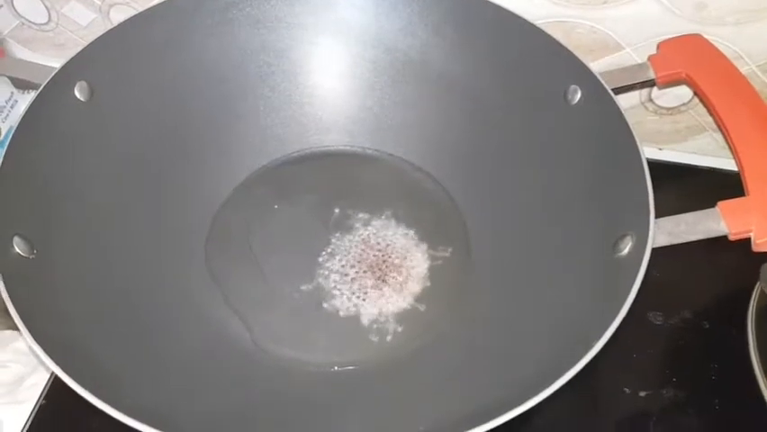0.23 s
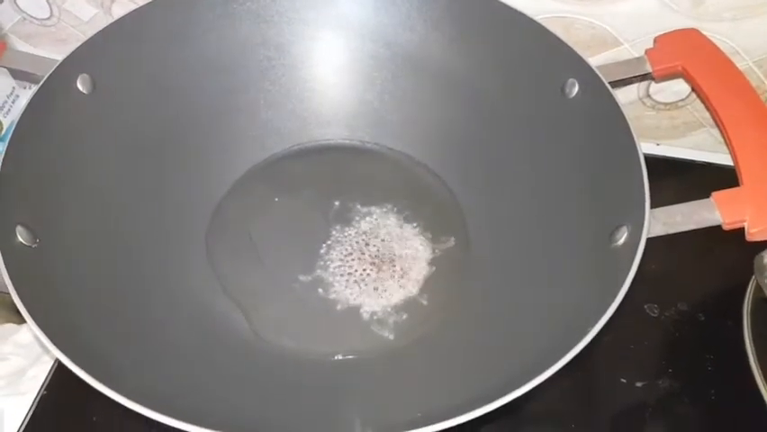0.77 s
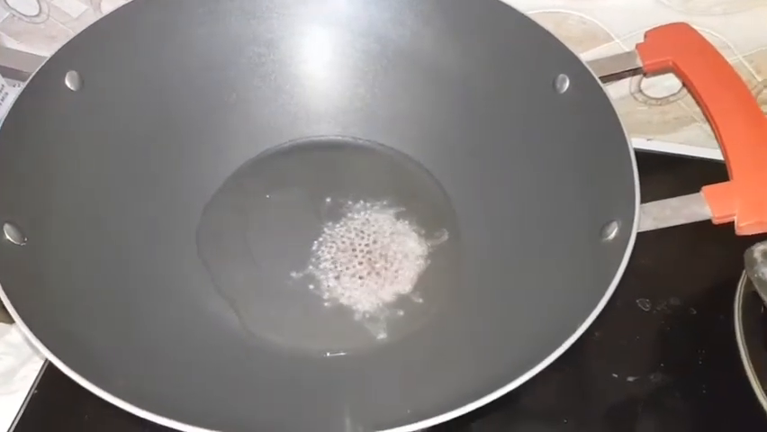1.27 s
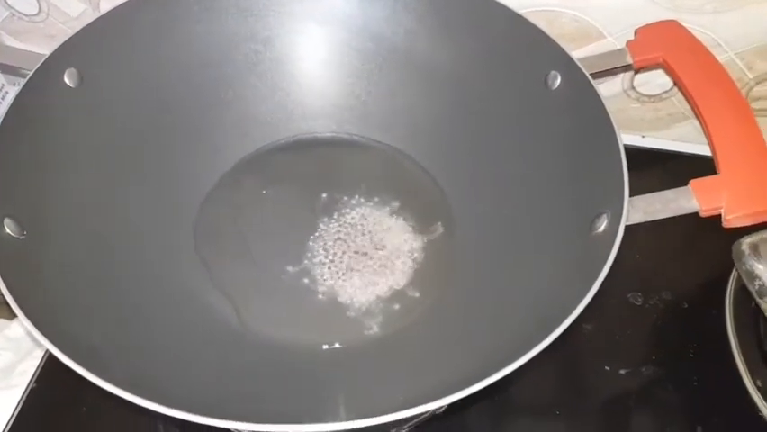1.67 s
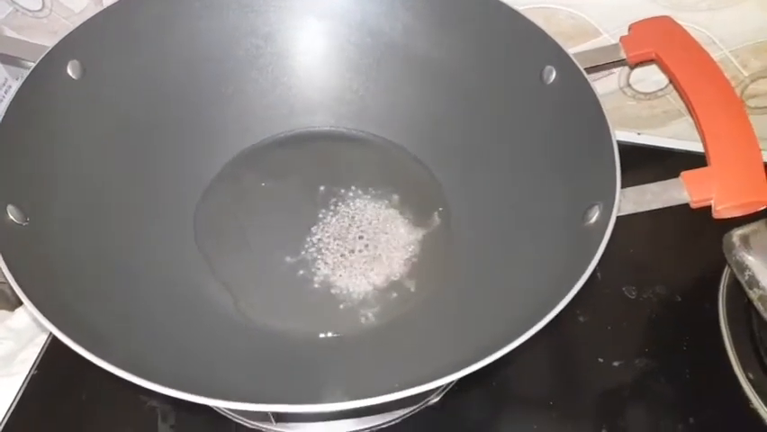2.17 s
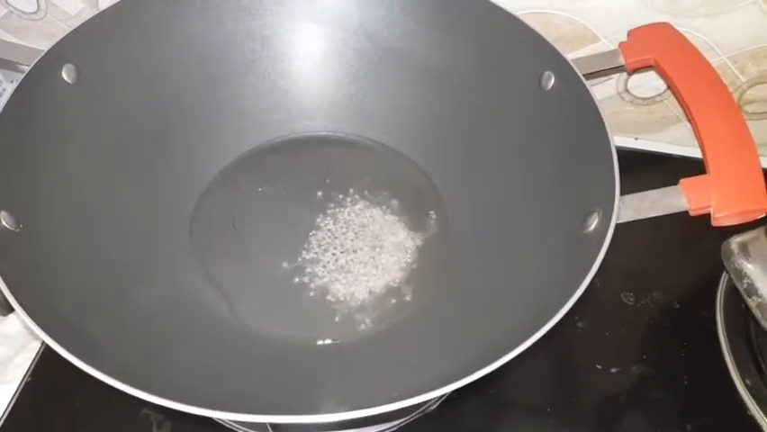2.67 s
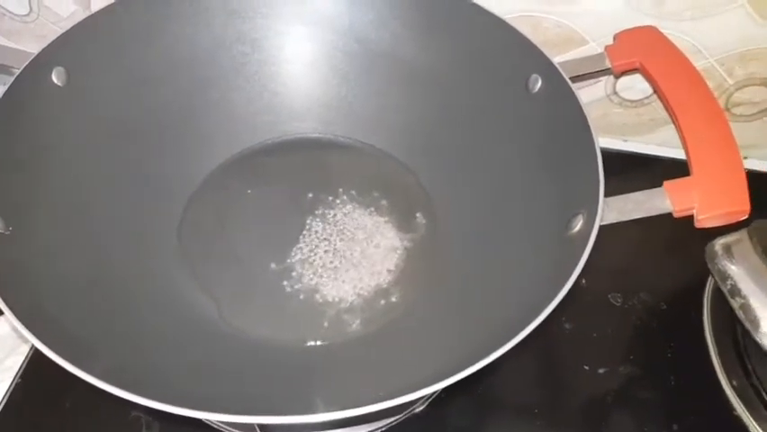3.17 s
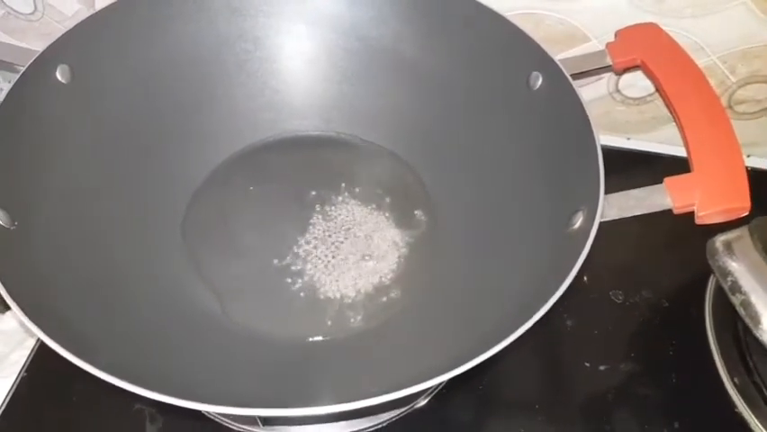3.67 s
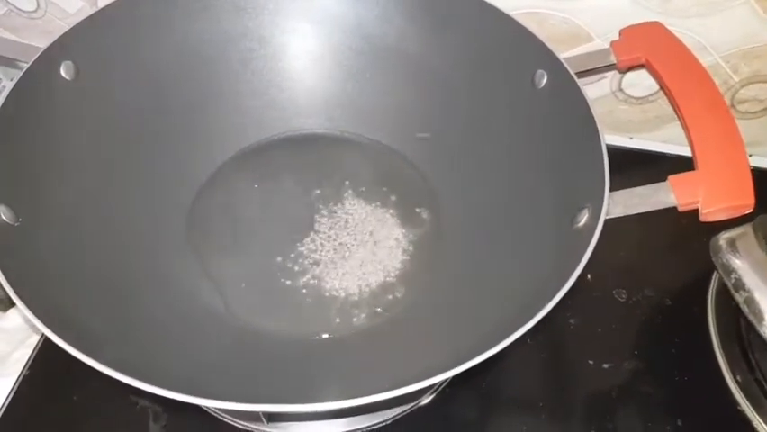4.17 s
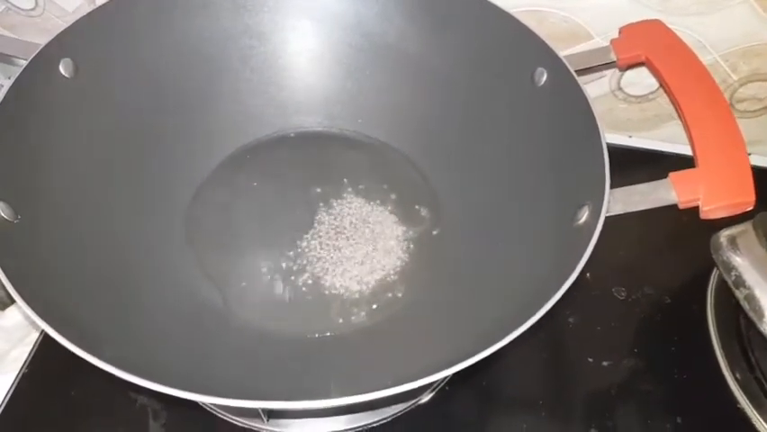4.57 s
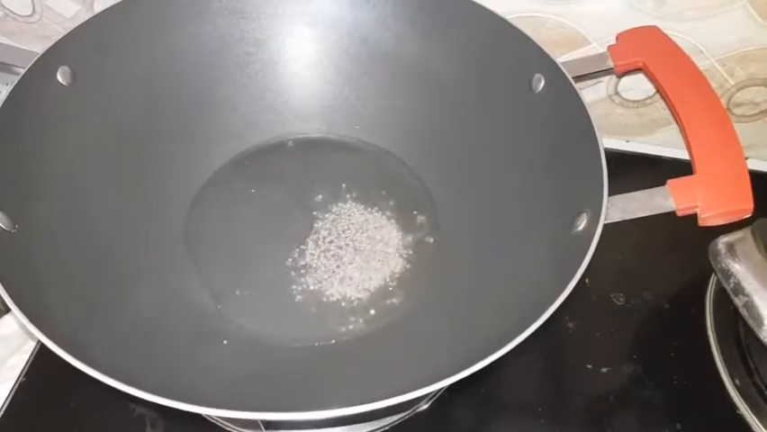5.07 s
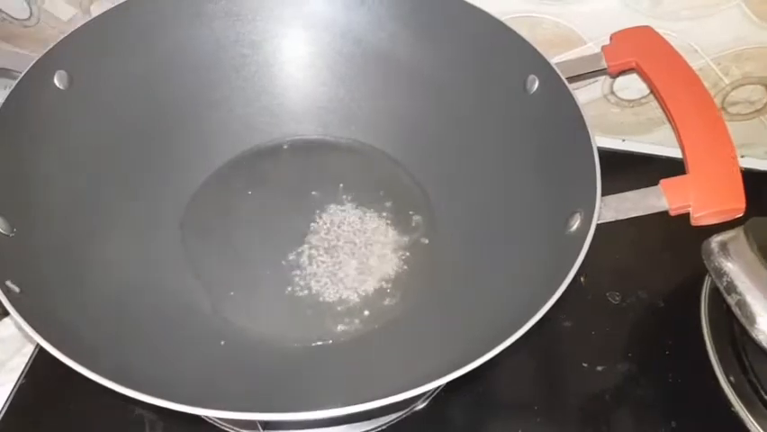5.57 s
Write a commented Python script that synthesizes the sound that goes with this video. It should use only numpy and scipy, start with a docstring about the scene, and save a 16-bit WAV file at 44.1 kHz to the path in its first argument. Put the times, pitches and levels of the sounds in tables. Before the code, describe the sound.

Close, sharp seed pops with hissing spurts of steam thicken from a few single cracks to a dense irregular crackle in a small kitchen.

```python
"""Mustard seeds splutter in hot oil in a wok, close to the microphone, in a small kitchen.
Husks crack and let out noisy spurts of steam, bubbles ring as decaying sines, and the pops crowd together
as it heats; steam whistles now and then, and dull knocks sound in the pan as band-passed noise.
A fine sizzle of random ticks and the fan and hum of the hob lie underneath.
The bowl and the room answer with short echoes."""
import sys
import numpy as np
from scipy import signal
from scipy.fft import rfft, irfft
from scipy.io import wavfile
from scipy.ndimage import uniform_filter1d

SR = 44100
rng = np.random.default_rng(int(sys.argv[2]) if len(sys.argv) > 2 else 0)


def unload_wav(signal):
    """Save mono or channel-first audio to the path in sys.argv[1] as 16-bit WAV at rate SR, clipped to [-1, 1]."""
    wavfile.write(
        sys.argv[1],
        SR,
        np.round(np.clip(np.atleast_2d(signal).T, -1, 1) * 32767).astype(np.int16),
    )


N = 256662
TIME = np.arange(N) / SR  # s


def gain_of(db):
    """Logarithmic level: decibels become an amplitude ratio."""
    return 10 ** (np.asarray(db) / 20)


def evened(x):
    """Normalisation: scales a signal to rms 1."""
    return x / np.sqrt(np.mean(x ** 2) + 1e-20)


def read(points, hz):
    """Interpolation: joins points by straight lines on a log-frequency axis."""
    f, value = np.transpose(points)
    return np.interp(np.log(hz + 1), np.log(f + 1), value)


def over_time(points):
    """Interpolation: joins points in time by straight lines."""
    return np.interp(TIME, *np.transpose(points))


def add(mix, s, sound):
    """Superposition: lays a two-channel sound into the mix at time s."""
    part = mix[:, max(round(s * SR), 0):][:, :sound.shape[1]]
    part += sound[:, :part.shape[1]]


def minimum_phase(points, size=512):
    """Minimum phase: the impulse response that delivers this spectrum's energy soonest."""
    db = np.maximum(read(points, abs(np.fft.fftfreq(size, 1 / SR))), -100)
    log_spectrum = np.conj(signal.hilbert(np.log(gain_of(db))))
    return np.fft.ifft(np.exp(log_spectrum)).real


def drift(cutoff_hz):
    """Random modulation: noise of rms 1 kept slow by a Gaussian low-pass."""
    lowpass = np.exp(-(np.fft.rfftfreq(N, 1 / SR) / cutoff_hz) ** 2)
    return evened(irfft(rfft(rng.standard_normal(N)) * lowpass, N))


def tone(hz):
    """Phase accumulation: a sine whose frequency may vary from sample to sample."""
    return np.sin(2 * np.pi * np.cumsum(hz) / SR)


def unsteady(share, size, smooth):
    """Frequency modulation: a factor round 1, its rms deviation a share of the pitch."""
    return 1 + share * evened(uniform_filter1d(rng.standard_normal(size), size=smooth))


def burst(envelope, colour, db, same):
    """Turbulence: coloured noise under an envelope; same is the power share alike at both ports."""
    common, left, right = rng.choice([-1., 1.], (3, len(envelope)))
    noise = np.sqrt(same) * common + np.sqrt(1 - same) * np.array([left, right])
    sound = signal.fftconvolve(noise * envelope, colour[None], axes=1)
    # Each channel is given the energy of the envelope at the given level.
    return gain_of(db) * sound * np.linalg.norm(envelope) / np.linalg.norm(sound, axis=1, keepdims=True)


def spurt_shape(length, rise_s=0.00064, size=6000):
    """Emptying vessel: flow starts at once and fades as the seed empties."""
    t = np.arange(size) / SR
    return (1 - np.exp(-t / rise_s)) * np.exp(-(t / length) ** 2)


# Spectrum of the fan's air. Each row: frequency in Hz, relative density in dB per Hz.
FAN = [(20, -25), (45, 6), (75, 1.5), (120, 7), (200, -10), (320, -8), (420, -13.5), (950, -21.5),
       (1210, -18), (1500, -27.5), (4000, -27)]
FAN_DB = -45.5  # rms of the air before the swell
# Likeness of the fan's air at the two ports. Each row: frequency in Hz, correlation from -1 to 1.
LIKENESS = [(50, 1), (250, 0.9), (600, 0.98), (3000, 0.12)]
# Tones of the hob. Each row: frequency in Hz, level in dB before throb and swell, rms waver as a share of pitch.
HUM = [(46.9, -40.5, 0.022), (98.2, -54, 0.0166), (1225, -68.5, 0.0097)]
# Swell of the whole drone. Each row: time in seconds, gain in dB.
DRONE = [(0, -1.5), (2.4, 2.5), (4.6, -1.5)]


def hob():
    """Broadband flow noise and tonal noise: the fan's rush, and wavering tones of rotor and mains."""
    hz = np.fft.rfftfreq(N, 1 / SR)
    a, b = rfft(rng.standard_normal((2, N)))
    same = np.clip(read(LIKENESS, hz), -1, 1)
    pair = np.array([a, same * a + np.sqrt(1 - same ** 2) * b])
    air = irfft(pair * gain_of(read(FAN, hz)), N)
    throb = 1 + .17 * drift(5)
    tones = sum(gain_of(db) * evened(tone(f * (1 + waver * drift(7.9)))) for f, db, waver in HUM)
    return gain_of(over_time(DRONE)) * (gain_of(FAN_DB) * evened(air) + throb * tones)


# Spectrum of a sizzle tick. Each row: frequency in Hz, relative density in dB per Hz.
SIZZLE = [(500, -7.5), (1500, -1.5), (2500, -2), (4000, -6), (6300, 0), (8500, -9.5), (11500, 2),
          (15700, -2), (17000, -4.5)]
# Course of the fine sizzle. Each row: time in seconds, level in dB before the trim.
SIMMER = [(0, -53.5), (.8, -52.5), (1.3, -50.5), (1.9, -45), (3, -51.5), (3.7, -46.5), (4.4, -51.5),
          (5.1, -48), (5.82, -52.5)]


def sizzle(per_s=1500, spread_db=2.0, trim_db=-3.0, clump_db=3.0, clump_hz=18):
    """Shot noise: tiny bubbles burst at random round the seeds in little flurries; a few are larger."""
    size_db = spread_db * np.minimum(rng.exponential(1, N), 7) + clump_db * drift(clump_hz)
    bursting = rng.random(N) < per_s / SR
    impulses = gain_of(size_db) * bursting * rng.standard_normal((2, N))
    ticks = signal.oaconvolve(impulses, minimum_phase(SIZZLE)[None], axes=1)[:, :N]
    return evened(ticks) * gain_of(trim_db + over_time(SIMMER))


# Dull knocks in the pan. Each row: start in seconds, fade time in seconds, centre in Hz, dry level in dB.
KNOCKS = [(0.362, 0.033, 1260, -45.5), (1.694, 0.036, 730, -46), (2.3113, 0.00091, 820, -14.5),
          (3.443, 0.0078, 237, -39), (3.762, 0.036, 766, -43.5), (4.089, 0.04, 800, -38),
          (4.106, 0.0018, 915, -27), (4.184, 0.024, 850, -43), (5.6948, 0.0027, 700, -26.5)]


def knocks(spread=2.0):
    """Damped resonance: the oil broadens each short knock to an octave either side of its centre."""
    out = np.zeros((2, N))
    for s, length, hz, db in KNOCKS:
        band = signal.butter(2, [hz / spread, hz * spread], "bandpass", fs=SR)
        colour = signal.lfilter(*band, signal.unit_impulse(SR // 100))
        add(out, s, burst(spurt_shape(length), colour, db, same=.85))
    return out


# Steam whistling through a split husk. Each row: start in seconds, fade time in seconds, mean pitch in Hz,
# dry level in dB.
WHISTLES = [(2.218, 0.019, 14460, -26), (2.217, 0.015, 12000, -34)]


def whistles(waver=0.008):
    """Jet tone: a narrow steam jet sings an unsteady high note."""
    out = np.zeros((2, N))
    for s, length, hz, db in WHISTLES:
        shape = spurt_shape(length)
        pitch = hz * unsteady(waver, len(shape), smooth=60)
        note = gain_of(db) * shape * evened(tone(pitch))
        add(out, s, np.array([note, note]))
    return out


# Bubbles that ring as they burst. Each row: start in seconds, mean pitch in Hz, decay by 60 dB in seconds,
# dry level in dB.
BUBBLES = [(0.1502, 2584, 0.023, -16.5), (0.3138, 4680, 0.0049, -20.5), (0.3195, 4660, 0.0041, -31),
           (0.8855, 2760, 0.0024, -27), (1.4578, 2930, 0.0025, -24), (1.6352, 3160, 0.0052, -11),
           (1.6365, 4230, 0.002, -15), (2.3119, 2200, 0.0047, -28.5), (2.3634, 3580, 0.0091, -9.5),
           (2.432, 2520, 0.014, -24), (3.606, 3300, 0.011, -23.5), (3.76, 3480, 0.01, -19.5),
           (3.8688, 3600, 0.0082, -21.5), (5.075, 4270, 0.0042, -21), (5.6897, 5450, 0.003, -15.5)]
# Close modes of a lopsided bubble. Each row: multiple of its pitch, relative level in dB.
LOBES = [(0.872, -3), (1, 5.5), (1.13, -0.5)]


def bubbles(rise_s=.0001, flutter=0.071, size=2000):
    """Cavity resonance: a bursting bubble rings in a few close modes, its pitch fluttering a little."""
    out, t = np.zeros((2, N)), np.arange(size) / SR
    for s, hz, t60, db in BUBBLES:
        turns = np.cumsum(hz * unsteady(flutter, size, smooth=20)) / SR
        fade = gain_of(-60 * t / t60)
        ring = sum(gain_of(lobe_db) * np.sin(2 * np.pi * ratio * turns) for ratio, lobe_db in LOBES)
        ring *= fade * (1 - np.exp(-t / rise_s))
        ring *= gain_of(db) * np.linalg.norm(fade) / np.linalg.norm(ring)
        add(out, s, np.array([ring, ring]))
    return out


def crack_share(length, even_s=0.012):
    """Energy partition: quick pops are all crack, slow ones mostly steam; equal at even_s."""
    return 1 / (1 + (length / even_s) ** 1.5)


# Seeds popping. Each row: time of the crack in seconds (steam leaks just before), snap level in dB (mainly
# 2-7 kHz), fizz level in dB (mainly above 7 kHz), steam's escape time in seconds. Levels are dry, for crack
# and steam together, as if packed into 1 ms.
POPS = [(0.1496, -20.5, -24.5, 0.01), (0.3138, -29, -39, .001), (0.361, -41, -56, .02),
        (0.8857, -15, -10, 0.0038), (1.458, -18, -22, 0.0011), (1.5583, -38, -24.5, 0.014),
        (1.566, -32.5, -24.5, .001), (1.636, -21.5, -21, 0.0072), (1.6748, -23, -18, 0.0092),
        (1.699, -29, -26, 0.012), (1.7097, -22.5, -13, .003), (1.7155, -31, -21.5, .003),
        (1.829, -37.5, -46, .012), (1.905, -29.5, -32, 0.04), (2.08, -38.5, -31.5, 0.00074),
        (2.221, -19.5, -15.5, 0.05), (2.319, -30, -25.5, 0.00094), (2.3636, -21, -18.5, 0.00045),
        (2.4331, -23.5, -21, 0.0054), (2.463, -34, -23, .026), (2.5349, -31.5, -22, 0.028),
        (2.5533, -21.5, -15, .001), (2.695, -39, -50, .004), (2.706, -37.5, -43, .003),
        (2.7483, -21, -11, 0.0027), (3.12, -34, -34.5, 0.0065), (3.174, -22.5, -15.5, 0.0019),
        (3.3755, -27.5, -36, .001), (3.4397, -18, -10.5, 0.016), (3.4944, -25, -32, 0.01),
        (3.518, -28.5, -37, .004), (3.5713, -25, -16, 0.0082), (3.5889, -27.5, -18.5, 0.0021),
        (3.661, -35.5, -26, .001), (3.746, -18.5, -12, 0.032), (3.759, -17, -16, 0.00058),
        (3.783, -18, -10, 0.019), (3.8613, -27, -38, .003), (3.8691, -24, -31, .003),
        (3.956, -42, -48, .006), (4.068, -24.5, -24.5, 0.0025), (4.1032, -14.5, -12, .002),
        (4.234, -21, -14.5, 0.0032), (4.382, -35, -38, .005), (4.4488, -22.5, -34.5, .001),
        (4.5329, -27, -25, 0.0014), (4.5477, -20, -15, 0.0039), (4.636, -33, -33, 0.00075),
        (4.691, -33, -21, 0.014), (4.7627, -28, -21, .002), (4.7867, -24, -21, 0.028),
        (4.9069, -31.5, -27, 0.00072), (4.9363, -29.5, -22, .024), (4.988, -28.5, -19.5, .001),
        (5.0168, -27, -17.5, 0.0012), (5.045, -29.5, -32, .001), (5.1805, -26.5, -20, 0.005),
        (5.2661, -23.5, -17.5, 0.0058), (5.2866, -17, -13.5, 0.013), (5.349, -27, -18, 0.029),
        (5.4219, -23.5, -12, 0.0056), (5.4559, -20.5, -11, .004), (5.6911, -20, -17.5, .001),
        (5.6951, -22, -25, 0.0018), (5.701, -19.5, -23, .004), (5.811, -29, -23, .01)]
# Spectrum of the snap. Each row: frequency in Hz, relative density in dB per Hz.
SNAP = [(100, -17.5), (400, -12), (1050, -11), (1500, -11.5), (2300, -3), (3600, 0), (5500, 4.5),
        (7000, 2.5), (9000, -11), (14000, -35.5)]
# Spectrum of the fizz. Each row: frequency in Hz, relative density in dB per Hz.
FIZZ = [(2000, -84), (5500, -7), (7200, -2.5), (8700, -8), (11000, 1), (13000, -1.5), (15700, -6),
        (17000, -3.5)]


def packed(shape):
    """Energy normalisation: gives an envelope the energy of a unit level held for one millisecond."""
    return shape * np.sqrt(SR / 1000) / np.linalg.norm(shape)


def spurts(snap, fizz, droplets_per_s=500, droplet_db=7, droplet_s=0.00059):
    """Jet noise: steam hisses through the oil and flings off droplets that crackle."""
    leak_share, leak_s = 0.71, .003  # steam leaks before the husk gives way: share of its length, limit in s
    out = np.zeros((2, N))
    for crack_s, snap_db, fizz_db, length in POPS:
        shape = spurt_shape(length)
        droplets = rng.exponential(1, len(shape)) * (rng.random(len(shape)) < droplets_per_s / SR)
        crackle = signal.lfilter([1], [1, -np.exp(-1 / (droplet_s * SR))], droplets)
        ragged = packed(shape * (1 + gain_of(droplet_db) * crackle))
        ragged *= np.sqrt(1 - crack_share(length))
        hiss = burst(ragged, snap, snap_db, same=0.23) + burst(ragged, fizz, fizz_db, same=0.2)
        add(out, crack_s - min(leak_share * length, leak_s), hiss)
    return out


def cracks(snap, fizz, decay_s=0.00041, faint_db=-42, count=24, size=160):
    """Impulsive fracture: each husk splits in a fraction of a millisecond; faint spits fall between."""
    out, t = np.zeros((2, N)), np.arange(size) / SR
    shape = packed(np.exp(-t / decay_s) - np.exp(-3 * t / decay_s))
    when, snap_spread, fizz_spread = rng.random((count, 3)).T
    spit_s = np.sqrt(when) * N / SR  # denser with heat
    no_steam = np.zeros(count)
    spits = np.transpose([spit_s, faint_db - 10 * snap_spread, faint_db - 10 * fizz_spread, no_steam])
    for crack_s, snap_db, fizz_db, length in [*POPS, *spits]:
        split = shape * np.sqrt(crack_share(length))
        add(out, crack_s, burst(split, snap, snap_db, same=0.63) + burst(split, fizz, fizz_db, same=0.62))
    return out


# Modes of the bowl's metal. Each row: frequency in Hz, relative level in dB.
WOK = [(780, -10), (1455, -5), (2384, -4), (3736, -4)]
# Reverberation of the kitchen. Each row: frequency in Hz, decay by 60 dB in seconds.
KITCHEN = [(200, 0.32), (2700, 0.18), (7000, 0.15), (15000, 0.16)]


def echoes(wok_db=-7, wok_s=0.0016, ring_db=-18.0, ring_t60=0.099, room_db=0.0, build_s=0.00085, size=16384):
    """Impulse response of one spot: quick echoes off the bowl, its damped ring, the kitchen's short tail."""
    t = np.arange(size) / SR
    arrivals = rng.random((2, size)) < 5000 / SR  # 5000 per second
    bowl = rng.standard_normal((2, size)) * arrivals * (t > .0004) * np.exp(-t / wok_s)
    ring = sum(gain_of(db - 60 * t / ring_t60) * np.sin(2 * np.pi * (hz * t + rng.random((2, 1))))
               for hz, db in WOK)
    hz, at, z = signal.stft(rng.standard_normal((2, size)), SR, nperseg=256)
    decay = gain_of(-60 * at / read(KITCHEN, hz)[:, None])
    tail = signal.istft(z * decay, SR, nperseg=256)[1][:, :size]
    tail *= 1 - np.exp(-(t / build_s) ** 2)
    parts = (wok_db, bowl), (ring_db, ring), (room_db, tail)
    return sum(gain_of(db) * h / np.linalg.norm(h, axis=1, keepdims=True) for db, h in parts)


def kitchen(x, count=5):
    """Convolution: sound takes turns among a few spots, each with its own pattern of echoes."""
    spot = np.arange(N) // (SR // 10) % count  # a new spot every 0.1 s
    return sum(signal.oaconvolve(x * (spot == k), echoes(), axes=1)[:, :N] for k in range(count))


# Colour between the two microphone ports. Each row: frequency in Hz, left minus right in dB.
TILT = [(300, 7.5), (2200, -8.5), (3600, 0), (5500, -8), (7200, -1), (9000, 5), (11500, 0.5), (14500, 3)]


def ports(x, lag_s=.00007):
    """Interchannel difference: each port has its own colour, and the right one hears slightly later."""
    hz = np.fft.rfftfreq(N, 1 / SR)
    lean = gain_of(read(TILT, hz) / 2)
    lag = np.exp(-2j * np.pi * hz * lag_s)
    return irfft(rfft(x) * np.array([lean, lag / lean]), N)


def scene():
    """Direct and reverberant sound: the pan sounds in the kitchen, over the hob."""
    snap, fizz, thuds = minimum_phase(SNAP), minimum_phase(FIZZ), knocks()
    oil = sizzle() + whistles() + bubbles() + spurts(snap, fizz) + cracks(snap, fizz)
    # Knocks go through the metal and stir the kitchen's air less than the pops do.
    room = kitchen(oil + gain_of(-3.5) * thuds)
    return hob() + ports(oil + thuds + room)


def record(dry, edge_hz=16050):
    """Band limitation: the recorder's low-pass, of linear phase."""
    lowpass = signal.firwin(201, edge_hz, window=("kaiser", 9), fs=SR)
    return signal.oaconvolve(dry, lowpass[None], "same")


dry = scene()
out = record(dry)
unload_wav(out)
```